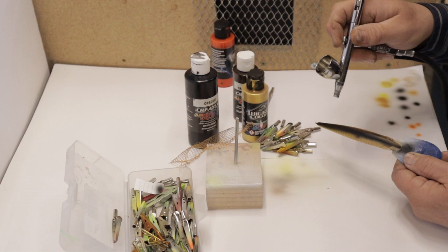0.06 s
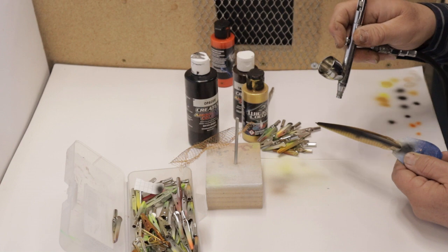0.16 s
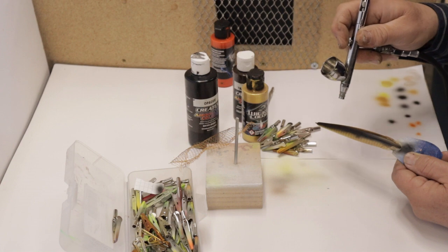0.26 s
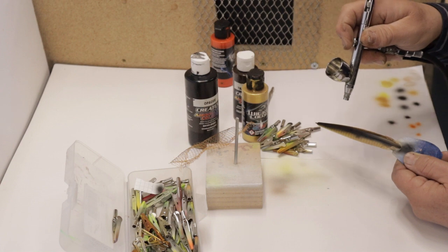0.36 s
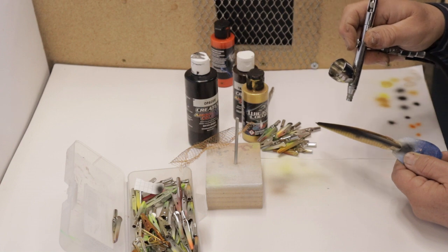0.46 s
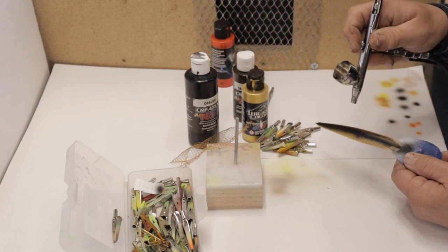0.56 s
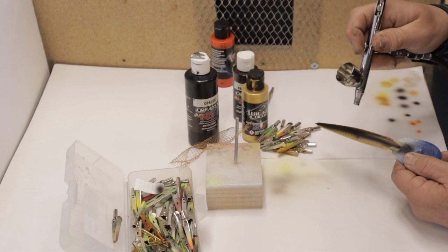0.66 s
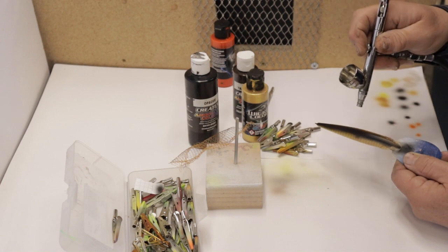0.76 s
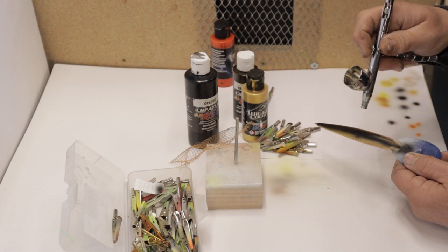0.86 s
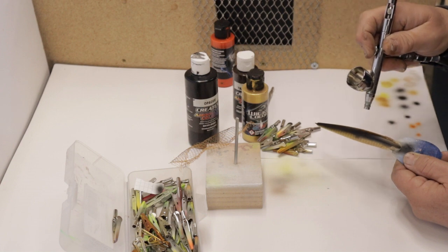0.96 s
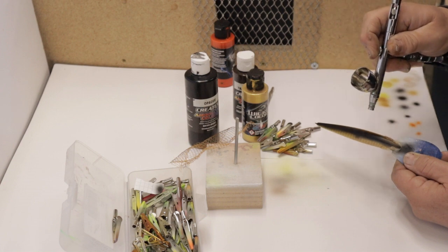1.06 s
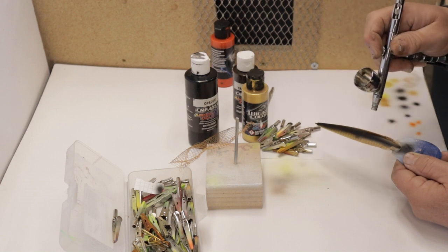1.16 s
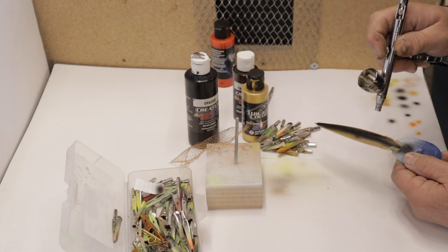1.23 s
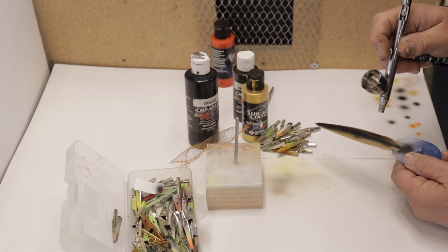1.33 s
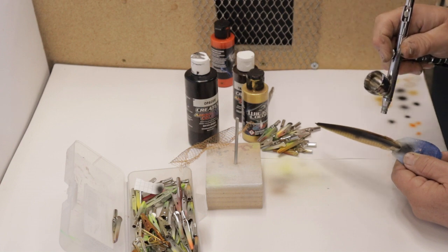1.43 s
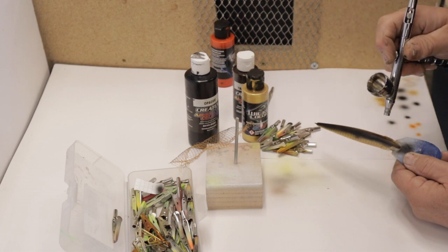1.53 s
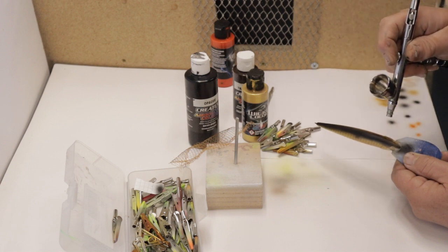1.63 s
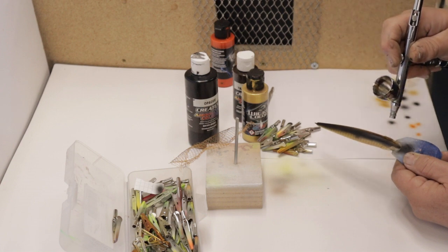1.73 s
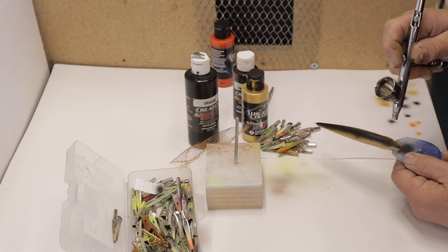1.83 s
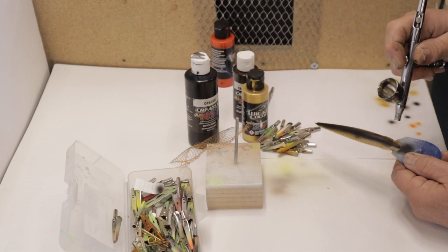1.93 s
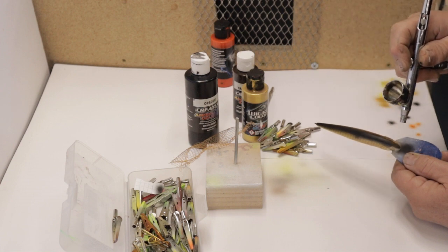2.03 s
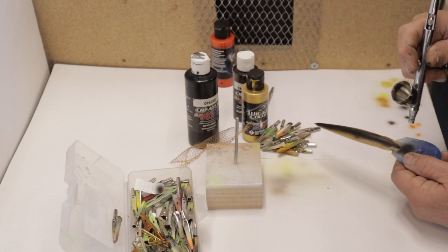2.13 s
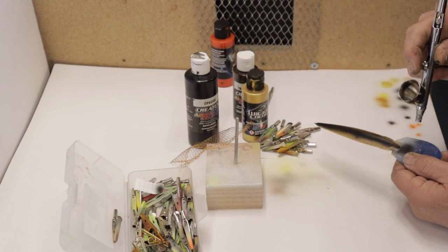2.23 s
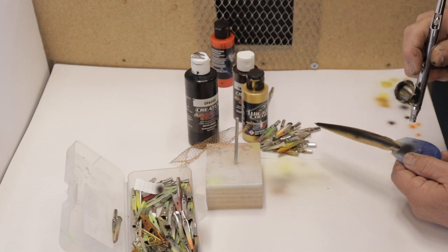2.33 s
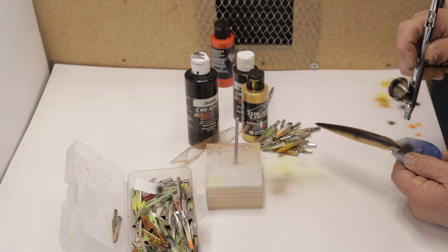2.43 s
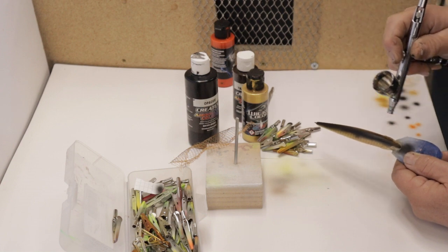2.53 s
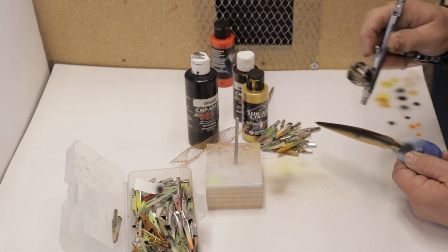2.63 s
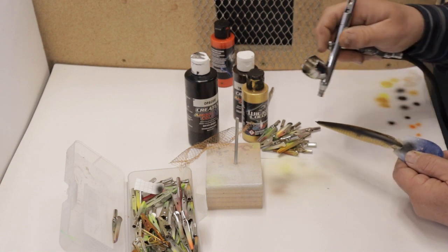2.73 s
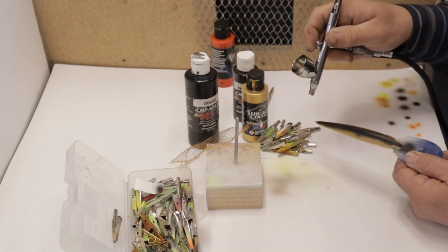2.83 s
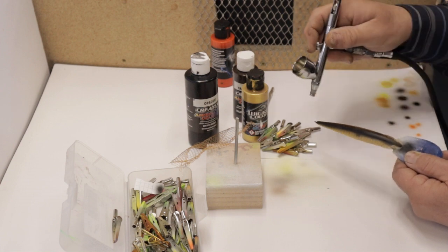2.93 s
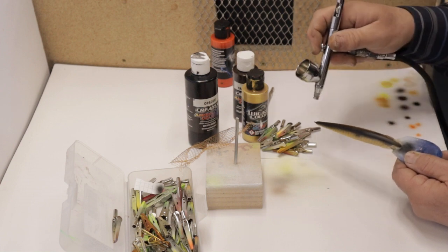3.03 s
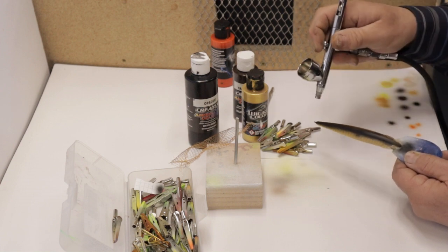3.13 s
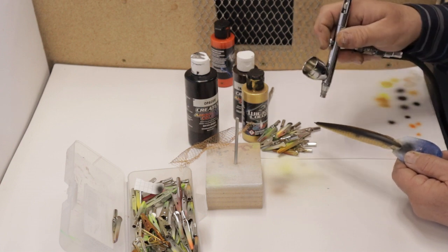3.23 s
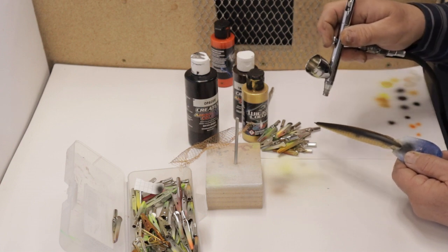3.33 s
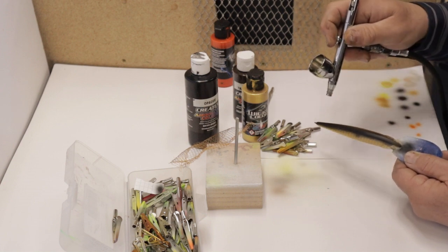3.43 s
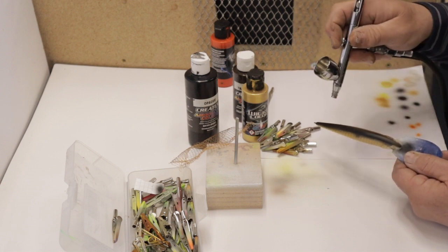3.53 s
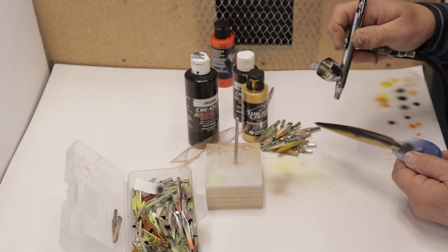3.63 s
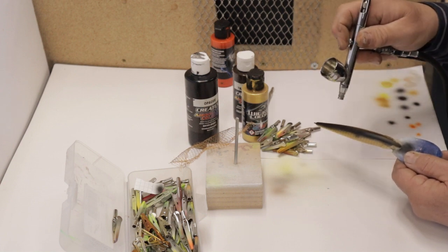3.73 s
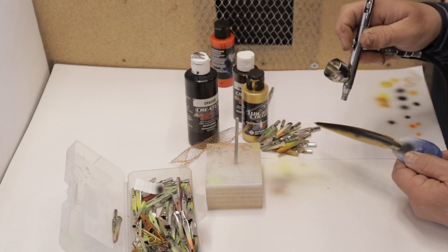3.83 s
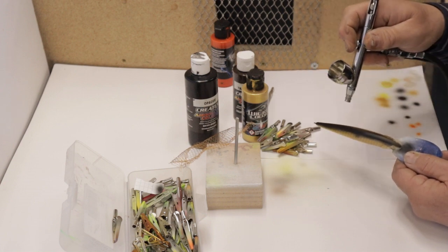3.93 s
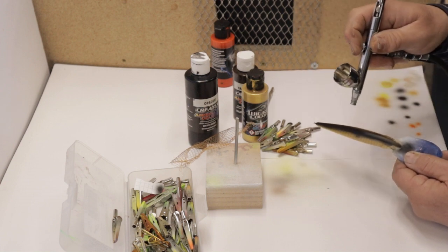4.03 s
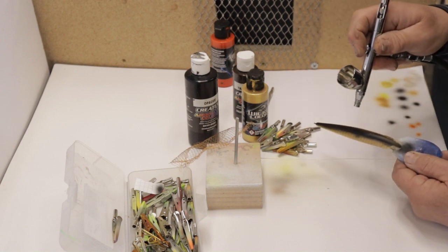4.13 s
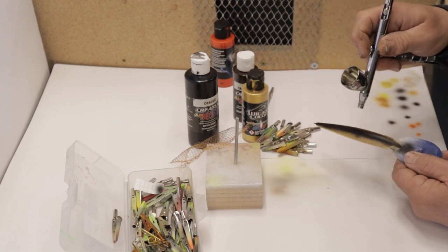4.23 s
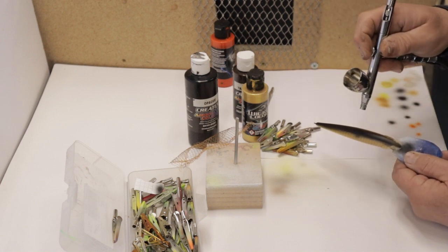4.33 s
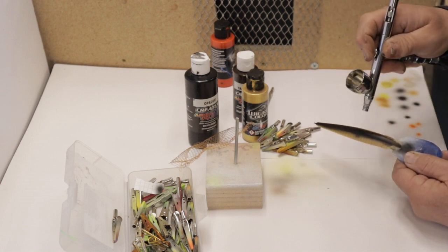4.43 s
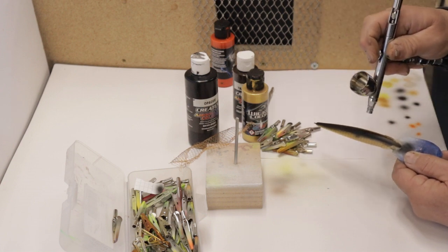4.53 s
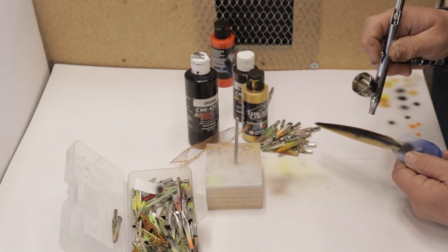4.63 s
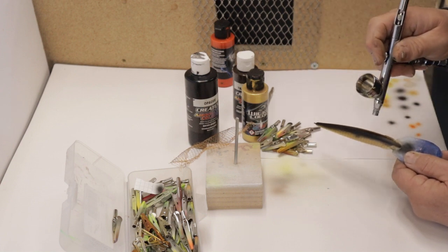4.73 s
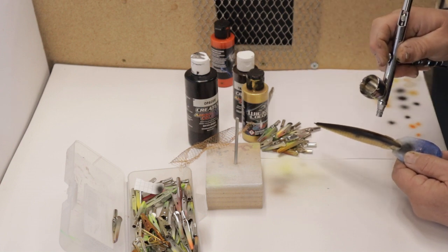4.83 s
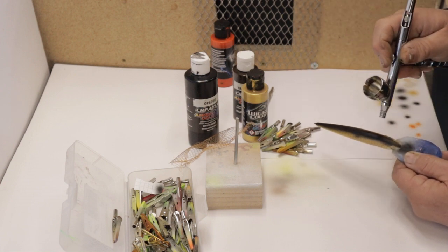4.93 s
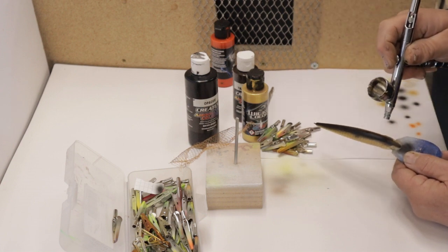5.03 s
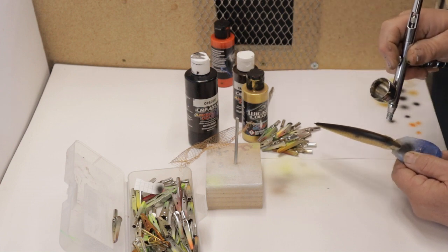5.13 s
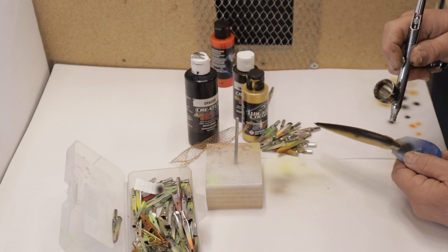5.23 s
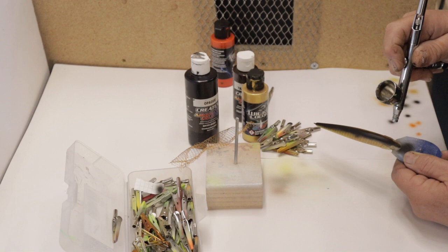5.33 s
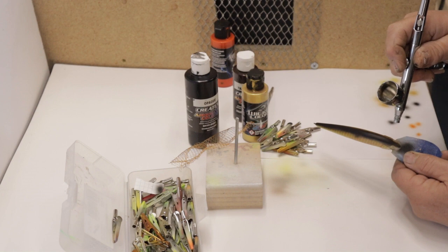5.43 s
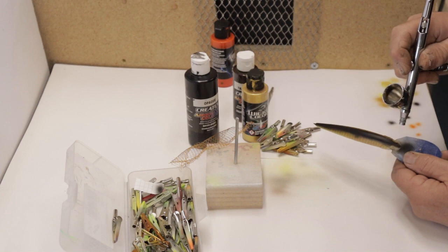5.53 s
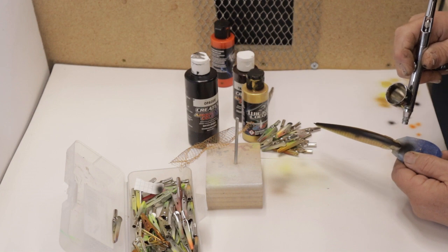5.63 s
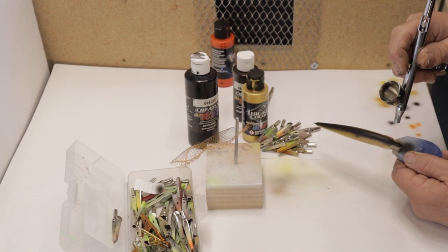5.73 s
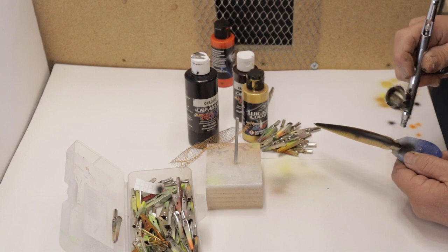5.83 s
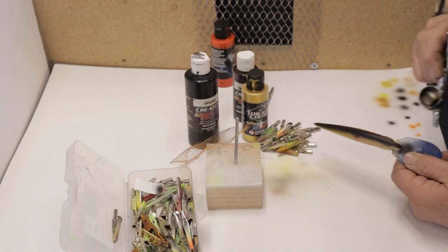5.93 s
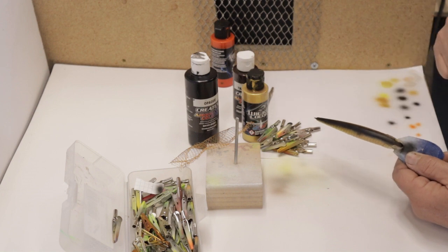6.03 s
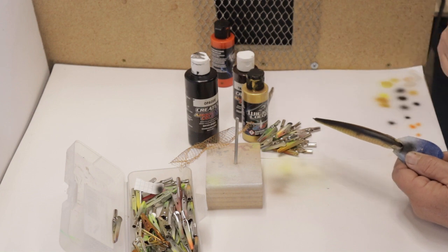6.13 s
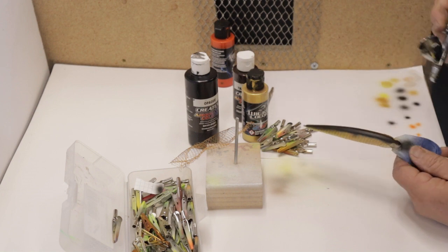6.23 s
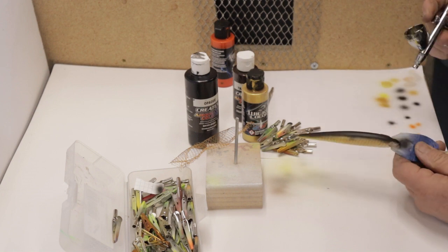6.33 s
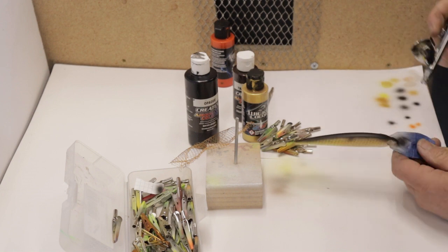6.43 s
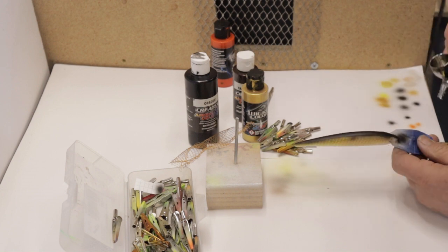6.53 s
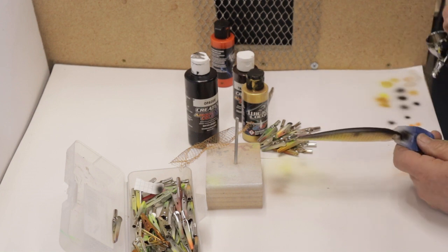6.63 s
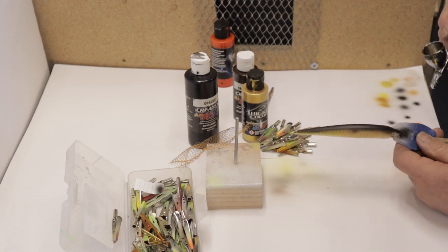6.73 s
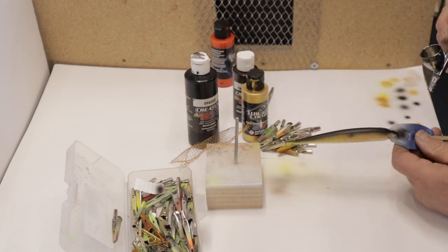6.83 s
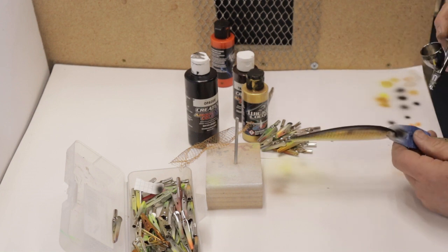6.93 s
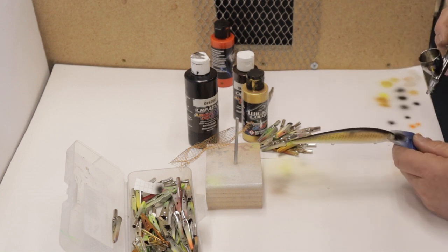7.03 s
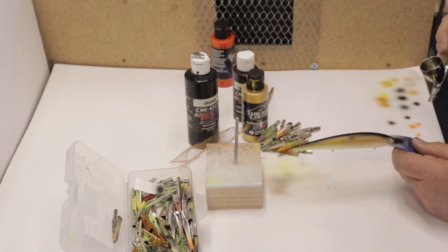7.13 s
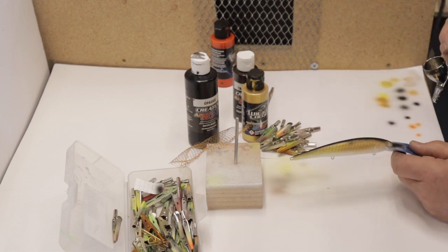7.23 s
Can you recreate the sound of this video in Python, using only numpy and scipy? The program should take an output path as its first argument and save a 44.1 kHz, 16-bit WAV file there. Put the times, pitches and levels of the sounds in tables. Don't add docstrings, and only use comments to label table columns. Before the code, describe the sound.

Close in a small spray booth, an airbrush is already hissing against a lure. The long pass cuts off sharply, a short dab follows, then a second long pass and a quick puff. Clicks, a dull table knock and a light clamp rattle fill the gap before one brief test spray on paper and last clicks. A fan rumbles low; the microphone is an arm's length away.

```python
import sys
import numpy as np
from scipy import signal
from scipy.fft import rfft, irfft, next_fast_len
from scipy.io import wavfile
from scipy.ndimage import uniform_filter1d, map_coordinates

SR = 44100
rng = np.random.default_rng(int(sys.argv[2]) if len(sys.argv) > 2 else 0)


def unload_audio(sound):
    columns = np.transpose(np.atleast_2d(sound))
    steps = np.round(np.clip(columns, -1, 1) * 32767)
    wavfile.write(sys.argv[1], SR, steps.astype(np.int16))


def voltage_ratio(decibels):
    exponent = np.asarray(decibels, float) / 20
    return 10 ** exponent


N = 321048
PADDED = next_fast_len(N + 4096)
T, F = np.arange(N) / SR, np.fft.rfftfreq(PADDED, 1 / SR)

# open_s, shut_s, rise_ms, fall_ms, leak_before_opening_db
VALVE = [
    (-.1, 2.334, 4, 4, -60),
    (2.5155, 2.743, 7, 4, -36),
    (3.171, 5.837, 11, 3.5, -21),
    (5.932, 6.072, 5, 4, -45),
    (6.903, 7.022, 8, 6, -25),
]
# time_s, roar_db, hiss_db
PULL = [
    [(0, -19.5, -28.5), (.4, -16, -32.5), (.65, -19.5, -35), (1., -18.5, -32), (1.5, -20.5, -32.5),
     (1.95, -20, -29.5), (2.08, -21, -25), (2.2, -20, -24.5), (2.3, -23, -37.5)],
    [(2.53, -21, -32.5), (2.59, -20.5, -32), (2.65, -19, -26), (2.74, -22.5, -35.5)],
    [(3.2, -33, -34.5), (3.31, -37, -36), (3.41, -22, -29), (3.85, -15, -30), (4.3, -19, -30),
     (4.7, -23.5, -25), (5.3, -20.5, -28.5), (5.68, -21.5, -22), (5.83, -22.5, -29.5)],
    [(5.94, -20, -22), (6., -23.5, -23), (6.07, -25.5, -28)],
    [(6.91, -18.5, -30), (6.97, -17.5, -26.5), (7.02, -22, -27.5)],
]
# time_s, place_cm from the tip of the lure (22 is the clamp, past 30 the paper)
TRAVEL = [(0, 0), (2.3, 24), (2.55, 24), (2.75, 20.5), (3.17, -8), (3.33, -2.5), (3.5, 1), (4.1, 6),
          (4.35, 11), (4.65, 11.5), (5.35, 19.5), (5.6, 23), (5.84, 25), (5.94, 25.5), (6.07, 27.5),
          (6.5, 37)]
# pitch_hz, level_db per Hz
JET = [(250, -14), (500, -9.5), (800, -6.5), (1500, -2), (2300, -3.5), (3700, -3.5), (5000, -7),
       (7000, -11), (9000, -12), (11500, -13), (13500, -15), (15800, -14.5)]
# low_hz, high_hz
STRIKE_BANDS = [(1300, 2900), (250, 600), (600, 1300), (2900, 5400)]
# place_cm, rumble_db, low_roar_db, rasp_db
STRIKE_BY_PLACE = [(-2, -33, -30.5, -19.5), (2, -56, -28.5, -25), (1.5, -42, -28, -22.5),
                   (7.5, -41.5, -23.5, -21), (9, -39.5, -23.5, -20.5), (12.5, -37.5, -23.5, -22),
                   (21, -34.5, -21.5, -21), (23.5, -40.5, -25.5, -21), (29, -39, -28, -23),
                   (30.5, -32.5, -18.5, -19)]
# roar_db_per_db, hiss_db_per_db
STRIKE_FOLLOW = [(0.97, -0.082), (0.53, -0.16), (0.69, -0.28), (0.6, 0.72)]
# low_hz, high_hz
NOZZLE_BANDS = [(5400, 7500), (7500, 10500), (10500, 17000)]
# place_cm, whistle_db, top_air_db
NOZZLE_BY_PLACE = [(0, -28, -31), (-1.5, -32, -34), (9, -32, -30.5), (10, -33.5, -32), (23, -32, -34),
                   (24, -31, -30.5), (26, -28, -30.5), (33, -30, -39.5)]
# roar_db_per_db, hiss_db_per_db
NOZZLE_FOLLOW = [(0., 1.), (-.05, 0.69), (-.05, 0.23)]
# place_cm, lag_ms, share
TABLE_ECHO = [(0, 1.59, 0.13), (10, 1.514, 0.16), (20.3, 1.516, 0.049), (30.2, 1.333, 0.15)]
# lag_at_tip_ms, drift_ms_per_cm, share
BOOTH_ECHOES = [(1.15, -0.0113, 0.044), (1.9, -0.0114, -0.073), (2.6, -0.0108, 0.019),
                (3.5, -0.0108, -0.013), (4.2, -.012, 0.044), (5.6, -0.0198, 0.045)]
# place_cm, centre_hz, lift_db
BELLY = [(-6, 3000, 1.5), (1, 1980, 3.5), (3.5, 2130, 2.5), (7.5, 2240, 7.5), (10.5, 2270, 9),
         (15.5, 2290, 6.5), (18, 2270, 4.5), (23, 2300, 0), (28.5, 1500, -1.3), (30, 1410, 5)]
# place_cm, centre_hz, lift_db
GAP = [(-10, 4400, 1.5), (-0.5, 2950, 5), (6, 2970, -6.5), (11, 3600, 3.5), (14, 3500, 6.5),
       (19.5, 3900, 6), (22, 4200, 2.5), (26, 4100, 4), (28, 4300, 3)]
# place_cm, centre_hz, lift_db
CAP = [(-2, 6600, 7), (-3.5, 5600, 4.2), (6.5, 5700, 1.4), (11, 6400, 3.8), (17, 6900, 7),
       (17.5, 6900, 1.6), (30, 6800, 1.4)]
# place_cm, centre_hz, lift_db
NEEDLE = [(-3, 8200, -2.5), (1.5, 10900, 3.5), (10.5, 9900, 3.5), (25, 8350, 3.5), (19.5, 8800, 3),
          (17, 8600, 9), (26, 8700, 3.5), (26, 8330, 6.5)]
# place_cm, centre_hz, lift_db
SHADOW = [(-3, 5000, -9), (-1, 5530, -2), (8, 5370, -17.5), (8, 5520, -6), (18, 5300, -10),
          (23.5, 5400, 0.5), (29, 4700, -4)]
COLOUR_WIDTHS = 440, 630, 800, 1100, 320
# centre_hz, width_hz, at_tip_db, over_body_db
NOTCHES = [(1180, 220, -5, -6), (1900, 170, 0, -8), (2700, 170, -2, -8), (3500, 170, -8, 0),
           (4450, 200, -6, 0), (7150, 250, -4, -5), (11400, 900, -3, -5)]
# start_s, peak_db, ring_db against the peak
CLICKS = [(2.359, -27, -24), (6.1005, -29, -20), (6.355, -39, -19), (6.373, -41, -27), (6.389, -37, -29),
          (6.392, -40, -29), (6.62, -46, -25), (6.695, -36, -25), (6.7357, -28, -20), (6.748, -27, -18),
          (6.7505, -31, -13), (6.776, -30.5, -17), (6.797, -42, -29), (6.811, -38, -23), (6.832, -43, -25),
          (6.846, -47, -29), (7.204, -33.5, -28), (7.2485, -32, -14), (7.2634, -30, -21), (7.2655, -27, -8)]
# pitch_hz, level_db, t60_s
LURE_MODES = [(2200, -12, .03), (3300, -15, .012), (4300, -15, .012)]
# pitch_hz, level_db, t60_s
CLAMP_MODES = [(6100, 5, 0.025), (9300, -6, .015)]
# start_s, peak_db, pitch_hz, push_ms
KNOCKS = [
    (5.934, -27, 300, 2),
    (6.4758, -18, 240, 2.2),
    (6.5228, -28, 240, 2.4),
    (6.5578, -33, 900, 2),
    (6.748, -38, 400, 2),
]
# middle_s, length_s, level_db
DRAG = [
    (2.97, 0.15, -48.5),
    (6.77, 0.066, -53),
]
# pitch_hz, t60_s, level_db
ROOM = [(250, 0.16, 21), (1000, 0.58, -0.5), (3000, 0.68, 2.5), (7000, 0.62, 2.5), (14000, 0.21, -4)]
# pitch_hz, level_db per Hz
FAN = [(15, -30), (25, -9), (64, -0.5), (112, -6.5), (175, -6), (270, -15), (600, -24), (1200, -29.5),
       (2200, -32), (5000, -40), (9700, -42.5), (15800, -44)]

USUAL_ROAR_DB, USUAL_HISS_DB = -20, -30


def airbrush():
    strike = turbulence(USUAL_ROAR_DB, STRIKE_BY_PLACE, STRIKE_FOLLOW, STRIKE_BANDS, flutter_db=0.24)
    nozzle = turbulence(USUAL_HISS_DB, NOZZLE_BY_PLACE, NOZZLE_FOLLOW, NOZZLE_BANDS, flutter_db=0.27)
    eddies = voltage_ratio(-1.0) * strike + nozzle
    flow = valve()
    jet = flow * colour(eddies)
    spray = table_echo(jet) + booth_echoes(jet)
    return spray, flow * eddies


def valve():
    leak_ms = 20
    flow = np.zeros(N)
    for start, stop, rise_ms, fall_ms, leak_db in VALVE:
        since_ms = (T - start) * 1000
        rise = np.clip(since_ms / rise_ms, 0, 1) ** 2
        leak = voltage_ratio(leak_db) * np.clip(1 + since_ms / leak_ms, 0, 1) ** 1.5
        fall = np.exp(-np.maximum(T - stop, 0) * 1000 / fall_ms)
        flow += np.maximum(rise, leak) * fall
    return flow


def turbulence(main_db, by_place, follow, bands, flutter_db):
    roar_db, hiss_db = curves(sum(PULL, []))
    spit = walk(24.84) + 0.39 * walk(300)
    levels_db = [main_db, *along(by_place)]
    out = 0
    for (lo_hz, hi_hz), db, (on_roar, on_hiss) in zip(bands, levels_db, follow):
        pull_db = on_roar * (roar_db - USUAL_ROAR_DB) + on_hiss * (hiss_db - USUAL_HISS_DB)
        waver_db = flutter_db * spit + 0.36 * walk(11)
        eddies = noise(voltage_ratio(shape(JET)) * band(lo_hz, hi_hz))
        out = out + voltage_ratio(db + pull_db + waver_db) * eddies
    return out


def colour(x):
    sharpen_per_db = 0.0332
    hz, s, frames = signal.stft(x, SR, nperseg=1024)
    hz, lift_db = hz[:, None], 0
    for table, width_hz in zip((BELLY, GAP, CAP, NEEDLE, SHADOW), COLOUR_WIDTHS):
        centre_hz, db = along(table, s)
        lift_db = lift_db + db * bell(hz, centre_hz, width_hz)
    at_s, _, hiss_db = np.transpose(sum(PULL, []))
    extra_hiss_db = np.interp(s, at_s, hiss_db) - USUAL_HISS_DB
    lift_db = lift_db * (1 + sharpen_per_db * extra_hiss_db)
    reach, = along([(4.3, 0), (10.6, 1)], s)
    clear, = along([(20.6, 1), (22.1, 0.12)], s)
    for centre_hz, width_hz, tip_db, body_db in NOTCHES:
        depth_db = tip_db + (body_db - tip_db) * reach
        lift_db = lift_db + clear * depth_db * bell(hz, centre_hz, width_hz)
    return signal.istft(frames * voltage_ratio(lift_db), SR, nperseg=1024)[1][:N]


def table_echo(jet):
    phase_turns, top_hz = 0.39, 4500
    lag_ms, share = along(TABLE_ECHO)
    bounce = tint(jet, np.exp(2j * np.pi * phase_turns) * band(1, top_hz, order=4))
    return (jet + share * late(bounce, lag_ms)) / np.sqrt(1 + share ** 2)


def booth_echoes(jet):
    cm = np.interp(T, *np.transpose(TRAVEL))
    return sum(share * late(jet, tip_ms + drift * cm) for tip_ms, drift, share in BOOTH_ECHOES)


def hands():
    out = np.zeros(N)
    add_clicks(out)
    add_knocks(out)
    return out + drag()


def add_clicks(out):
    tick_t60_s, rattle_db, rattle_t60_s = 0.0025, -12, 0.04
    t = T[:SR // 8]
    crack = noise(band(1300, 4700, order=4))
    sizes_db = 3 * rng.standard_normal((len(CLICKS), len(LURE_MODES)))
    for (s, db, ring_db), size_db in zip(CLICKS, sizes_db):
        tick = mode(t, 3200, 0, tick_t60_s)
        rattle = crack[int(s * SR) // 2:][:len(t)] * voltage_ratio(rattle_db - 60 * t / rattle_t60_s)
        body = sum(mode(t, hz, g_db + d, t60) for (hz, g_db, t60), d in zip(LURE_MODES, size_db))
        ring = sum(mode(t, hz, ring_db + g_db, t60) for hz, g_db, t60 in CLAMP_MODES)
        add(out, s, voltage_ratio(db) * (tick + rattle + body + ring))


def add_knocks(out):
    t = T[:SR // 8]
    for s, db, hz, push_ms in KNOCKS:
        u = t * 1000 / push_ms
        push = u ** 2 * np.exp(2 - 2 * u)
        add(out, s, voltage_ratio(db) * push * np.cos(2 * np.pi * hz * t))


def drag():
    swell = sum(voltage_ratio(db) * np.exp(-((T - s) / length) ** 2) for s, length, db in DRAG)
    rustle = noise(band(230, 1100, order=6) * (1 + 0.75 * bell(F, 930, 200)))
    return swell * voltage_ratio(2.3 * walk(40.25)) * rustle


def room(x):
    level_db, onset_s = -23.5, 0.0039
    t, (at_hz, t60_s, db) = T[:SR], np.transpose(ROOM)
    tail = 0
    for hz in 250 * 2. ** np.arange(0, 6.1, .5):
        start_db = np.interp(np.log(hz), np.log(at_hz), db)
        decay_db = start_db - 60 * t / np.interp(np.log(hz), np.log(at_hz), t60_s)
        tail = tail + noise(band(hz / 1.19, hz * 1.19))[:SR] * np.sqrt(hz) * voltage_ratio(decay_db)
    tail = tail * np.clip(t / onset_s, 0, 1)
    return voltage_ratio(level_db) * signal.fftconvolve(x, tail / np.sqrt(np.sum(tail ** 2)))[:N]


def fan():
    rumble_db, hum_db = -41, -46.5
    hum = noise(bell(F, 116.6, 23))
    swell_db = 0.6 * walk(3)
    return voltage_ratio(rumble_db + swell_db) * noise(voltage_ratio(shape(FAN))) + voltage_ratio(hum_db) * hum


def unit(x):
    return x / np.sqrt(np.mean(x ** 2))


def shape(table, hz=F):
    at_hz, value = np.array(table)[:, 0], np.array(table)[:, 1]
    return np.interp(np.log(hz + 1), np.log(at_hz), value)


def curves(table):
    s, *columns = np.transpose(table)
    return [np.interp(T, s, c) for c in columns]


def along(table, s=T):
    cm, *columns = np.transpose(table)
    place_cm = np.interp(s, *np.transpose(TRAVEL))
    return [np.interp(place_cm, cm, c) for c in columns]


def band(lo_hz, hi_hz, hz=F, order=8):
    return 1 / np.sqrt((1 + (lo_hz / (hz + 1)) ** order) * (1 + (hz / hi_hz) ** order))


def bell(hz, centre_hz, width_hz):
    return 1 / (1 + (2 * (hz - centre_hz) / width_hz) ** 2)


def mode(t, hz, db, t60_s):
    return np.sin(2 * np.pi * hz * t) * voltage_ratio(db - 60 * t / t60_s)


def tint(x, gain):
    return irfft(rfft(x, PADDED) * gain, PADDED)[..., :N]


def noise(gain):
    return unit(tint(rng.standard_normal(PADDED), gain))


def walk(rate):
    k = int(SR / rate)
    steps = np.repeat(rng.standard_normal(N // k + 1), k)
    return unit(uniform_filter1d(uniform_filter1d(steps, k), k)[:N])


def late(x, lag_ms):
    return map_coordinates(x, [np.arange(N) - lag_ms * SR / 1000], order=3)


def add(out, start, sound):
    i = int(start * SR)
    out[i:i + len(sound)] += sound[:N - i]


def scene():
    plain_share = 0.89
    spray, plain = airbrush()
    touch = tint(hands(), band(1, 9500))
    around = np.sqrt(plain_share) * plain + (1 - plain_share) * spray + touch
    return np.tile(spray + touch + room(around) + fan(), (2, 1))


def side_noise(mono):
    count, half_width_hz = 42, 750
    size = int(46 * SR / 1000)
    hz, fade = np.fft.rfftfreq(size, 1 / SR), np.hanning(size)
    quiet = uniform_filter1d(mono ** 2, size) < voltage_ratio(-76)
    side = voltage_ratio(-77) * noise(band(4000, 8500, order=30)) * uniform_filter1d(1. * quiet, size)
    for when, pitch, *turns in rng.random((count, 2 + len(hz))):
        i = int(when * (N // 1024 - 3)) * 1024 + 429
        centre_hz = np.interp(pitch, (0, 1), (4600, 15000))
        patch = np.abs(rfft(mono[i:i + size])) * (np.abs(hz - centre_hz) < half_width_hz)
        scrambled = irfft(patch * np.exp(2j * np.pi * np.array(turns)), size)
        add(side, i / SR, voltage_ratio(-2) * fade * scrambled)
    return side


def roll_off(x):
    return signal.sosfilt(signal.butter(12, 16670, fs=SR, output="sos"), x)


def record(dry):
    rounded = dry / (1 + (dry / .95) ** 8) ** (1 / 8)
    stereo = rounded + np.outer([1, -1], side_noise(dry[0]))
    mix = tint(stereo, np.clip((15880 - F) / 120, 0, 1) ** 2)
    return roll_off(mix)


dry = scene()
out = record(dry)
unload_audio(out)
```